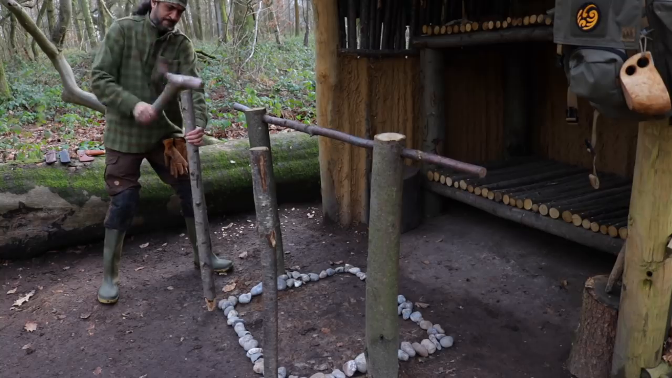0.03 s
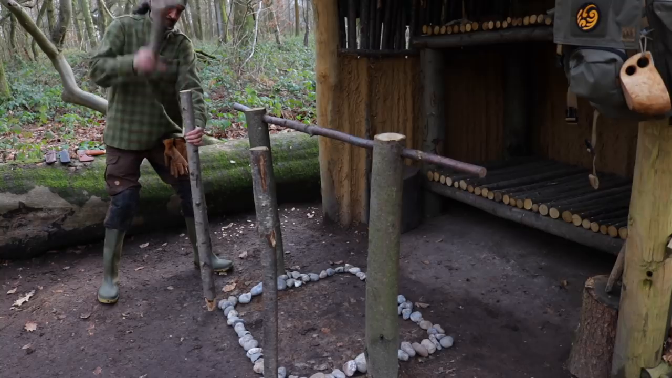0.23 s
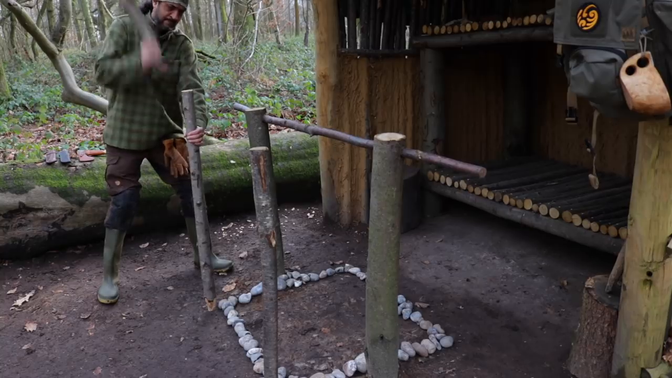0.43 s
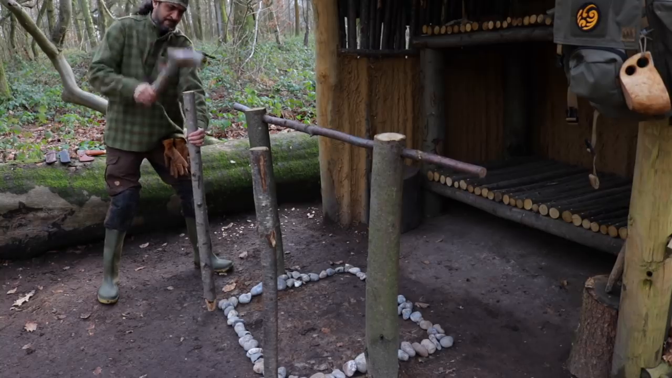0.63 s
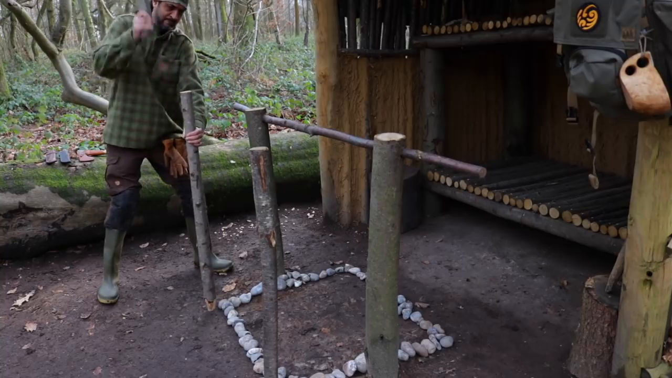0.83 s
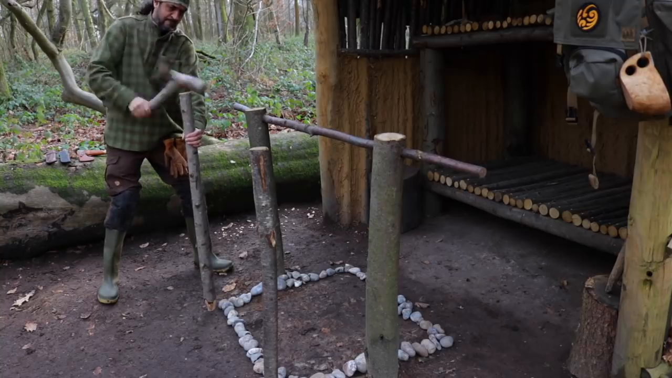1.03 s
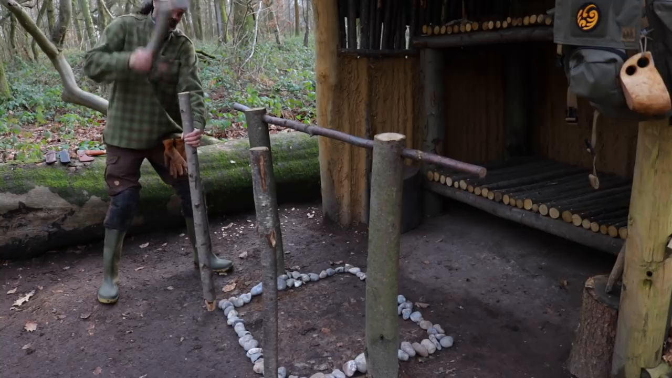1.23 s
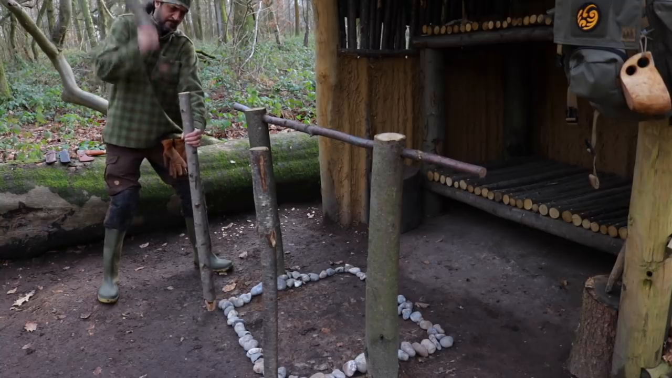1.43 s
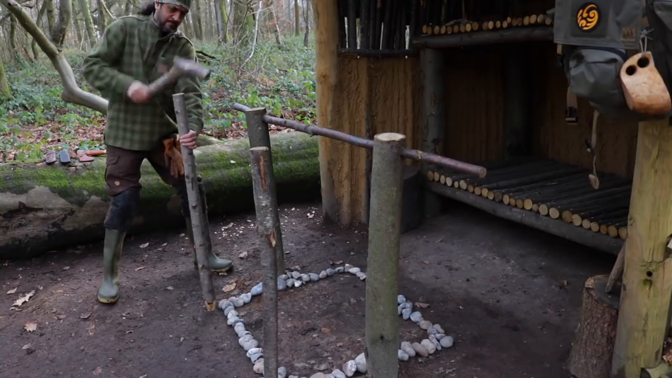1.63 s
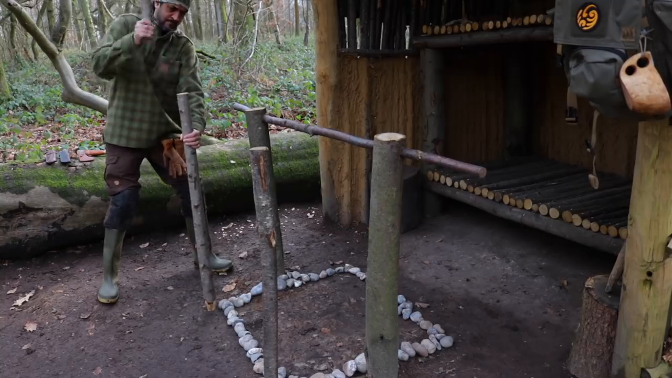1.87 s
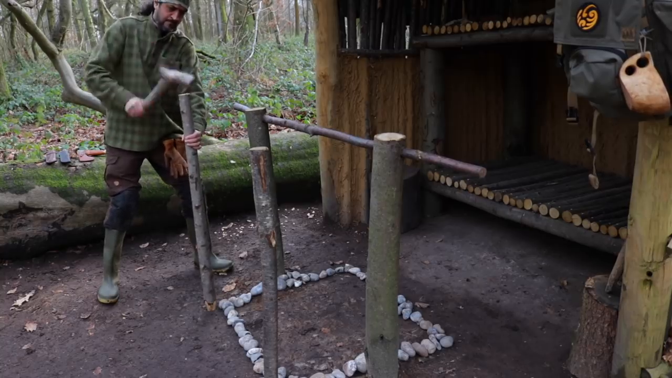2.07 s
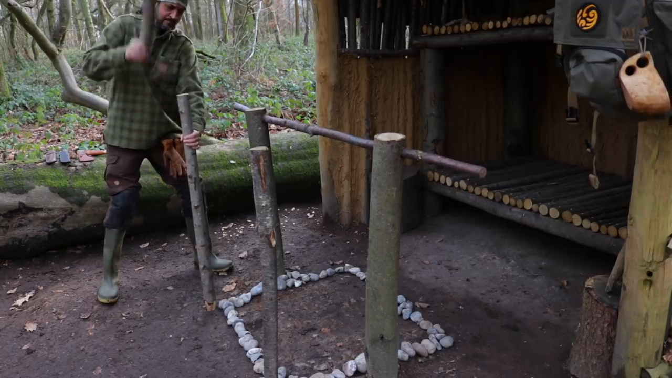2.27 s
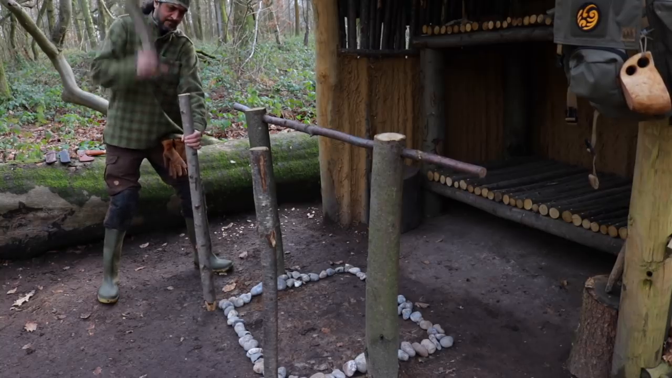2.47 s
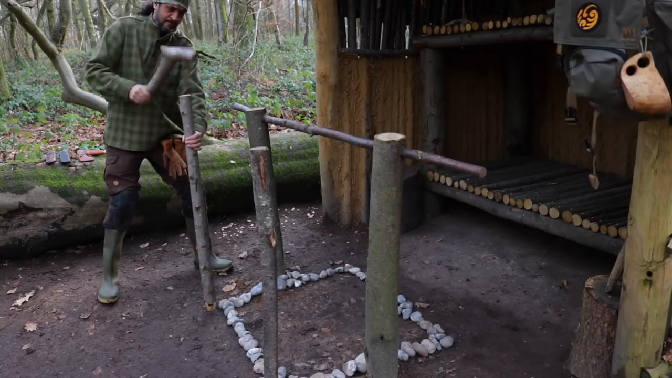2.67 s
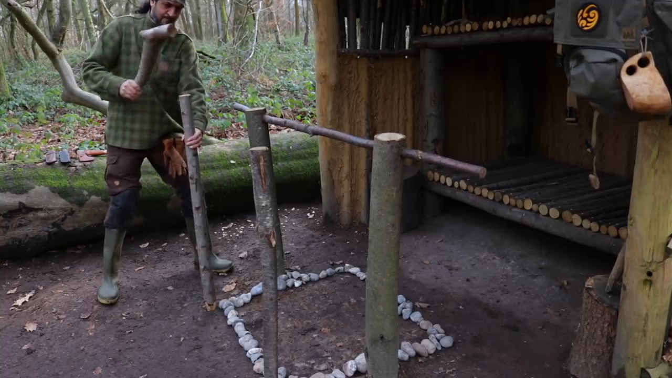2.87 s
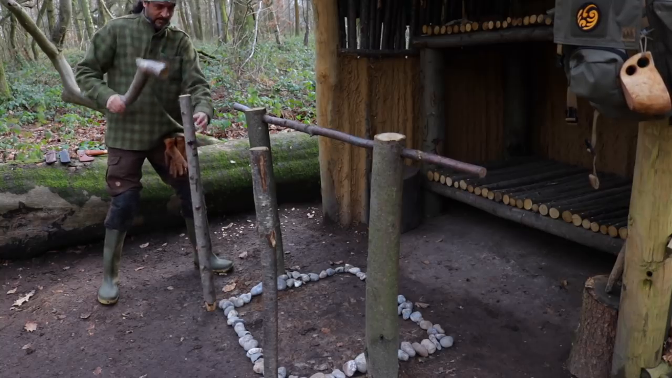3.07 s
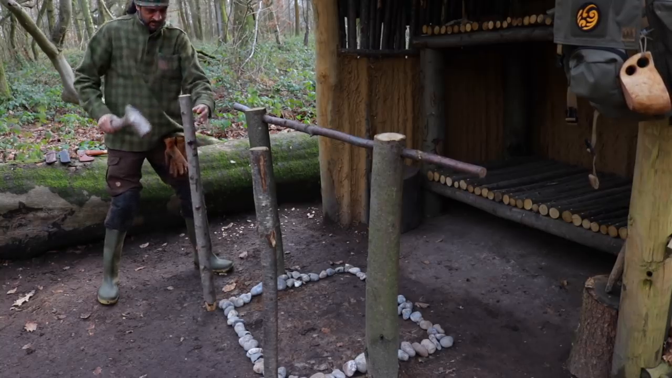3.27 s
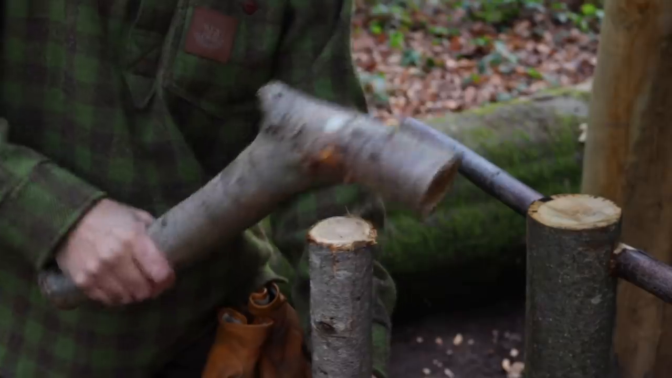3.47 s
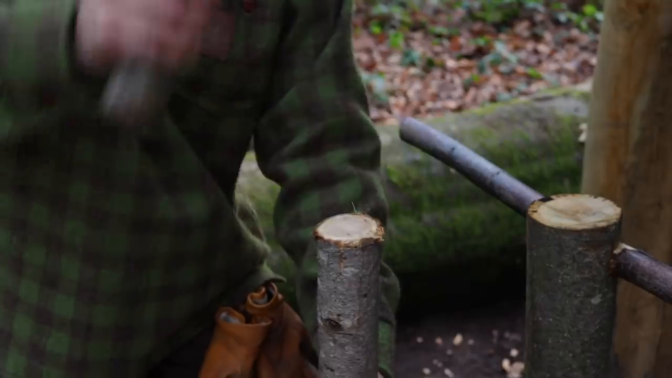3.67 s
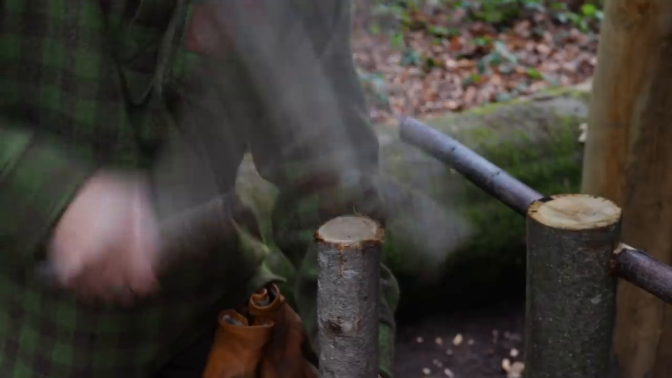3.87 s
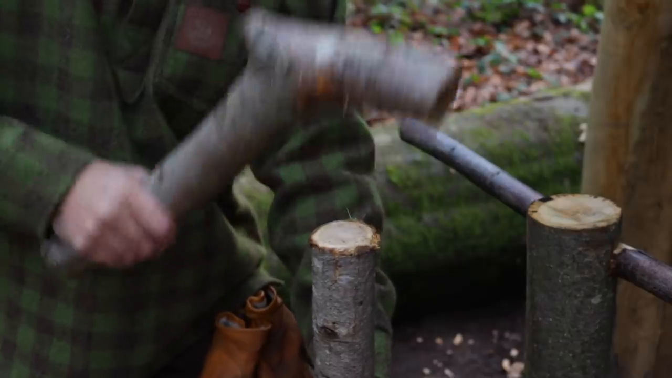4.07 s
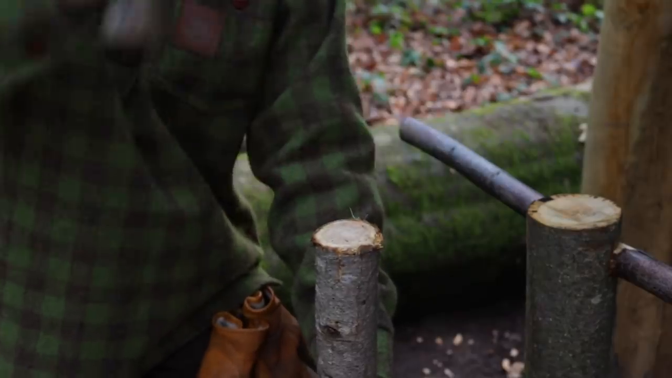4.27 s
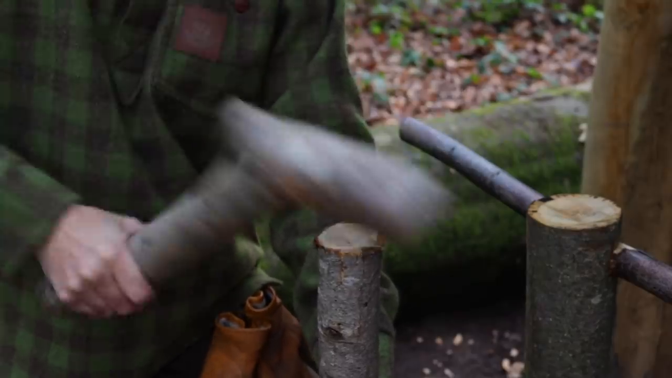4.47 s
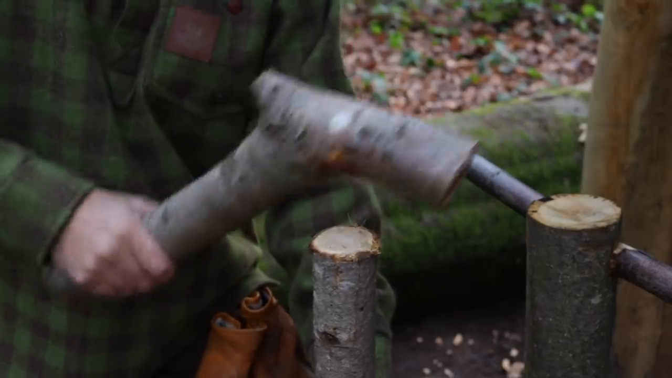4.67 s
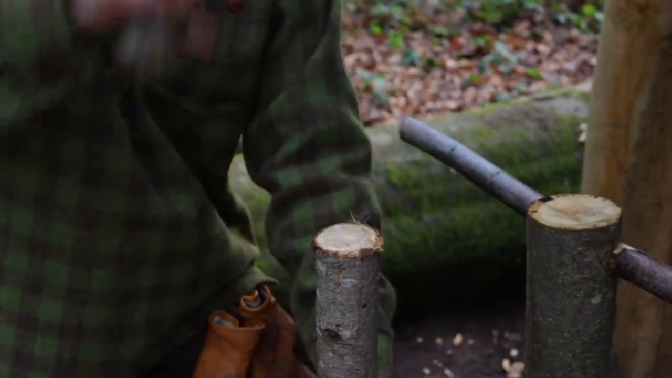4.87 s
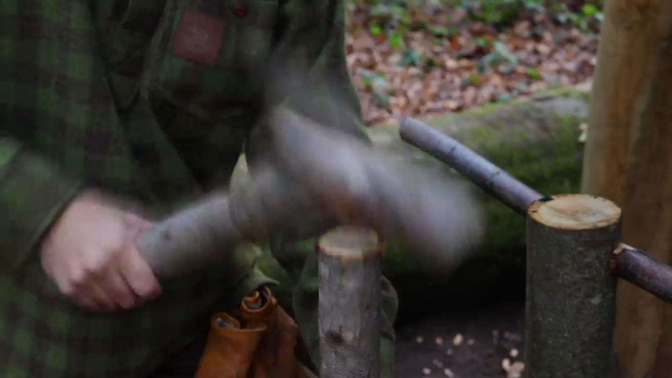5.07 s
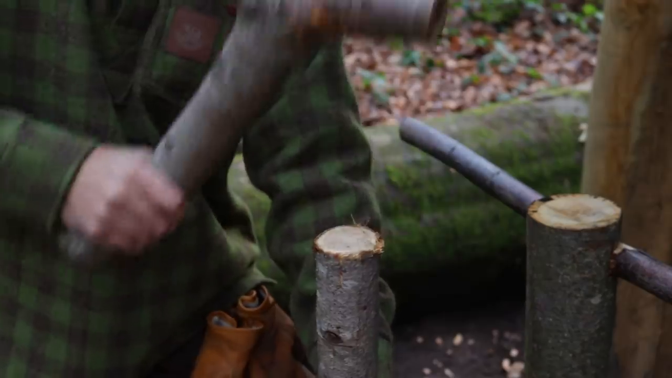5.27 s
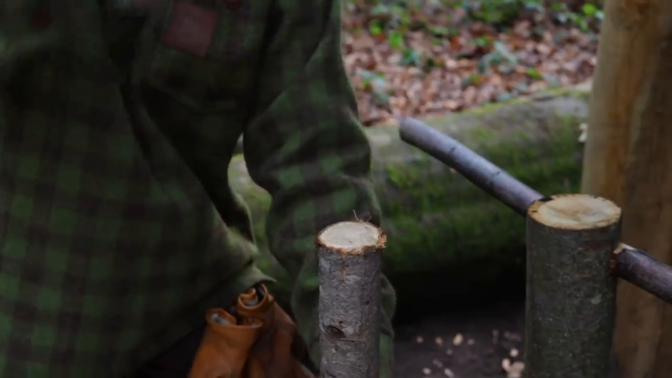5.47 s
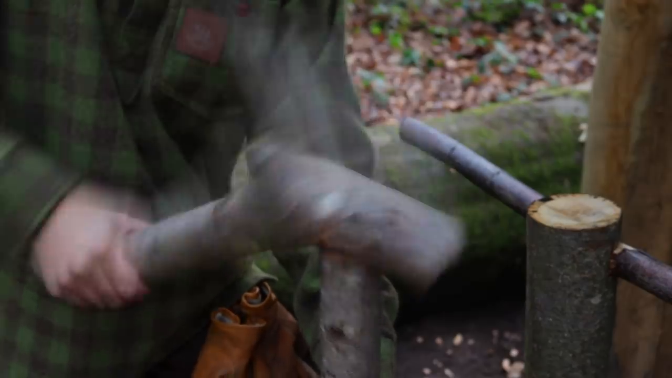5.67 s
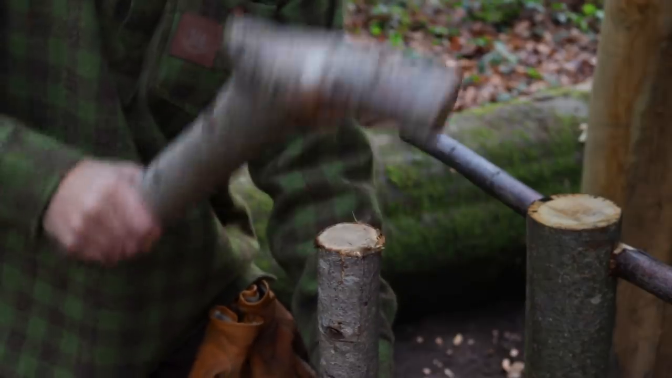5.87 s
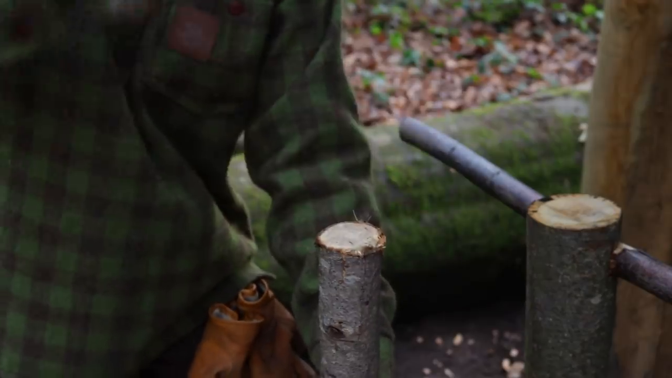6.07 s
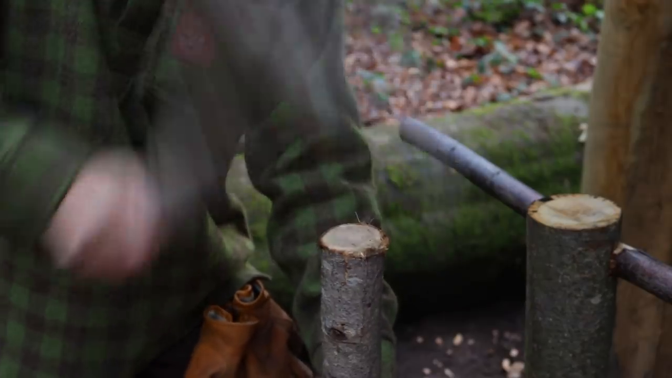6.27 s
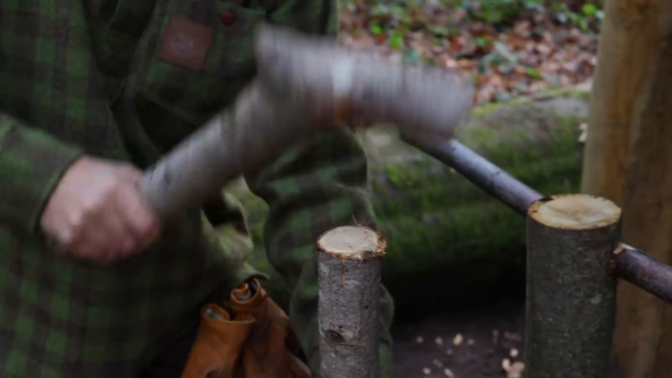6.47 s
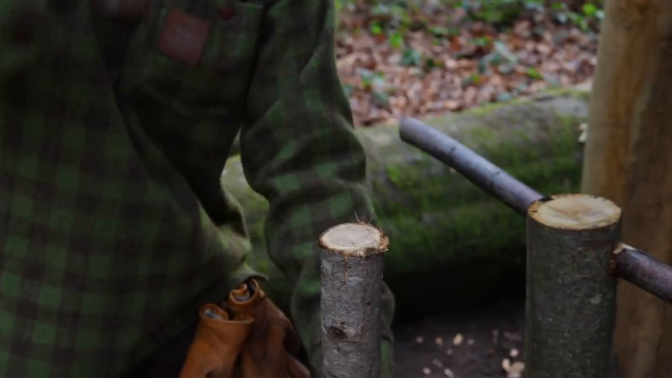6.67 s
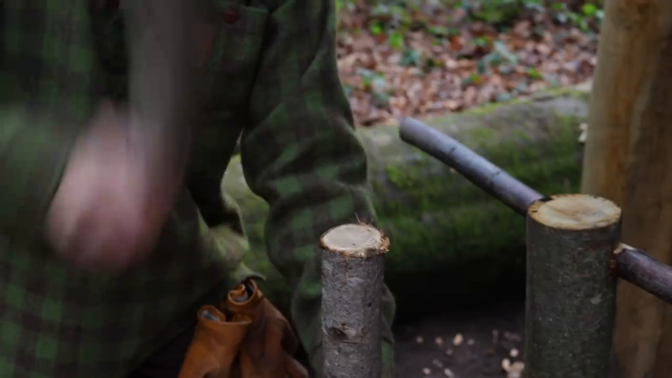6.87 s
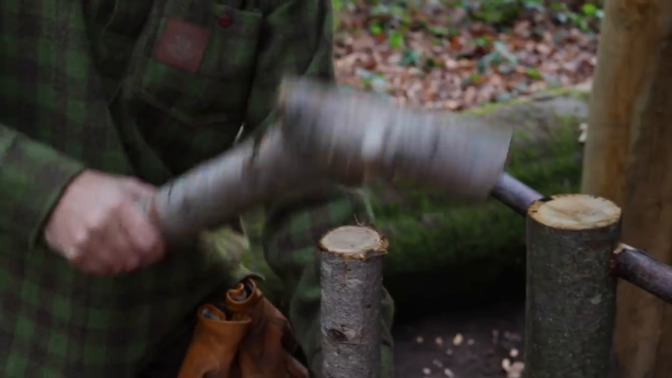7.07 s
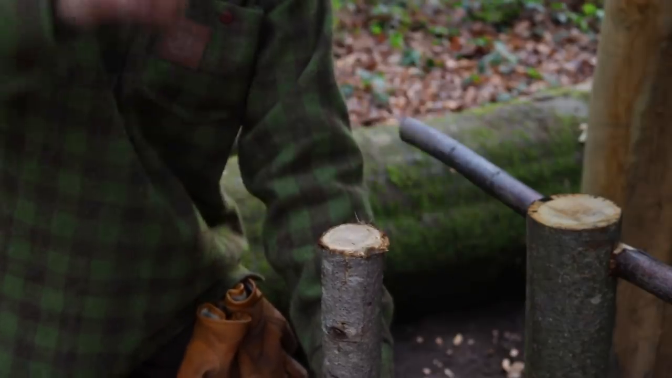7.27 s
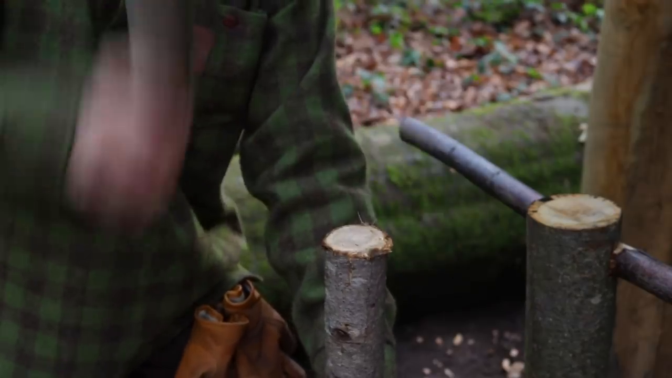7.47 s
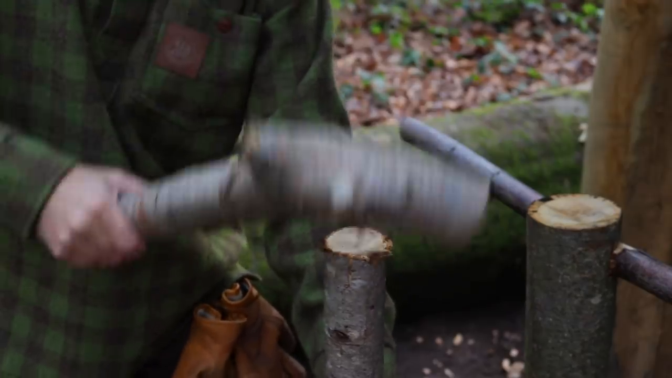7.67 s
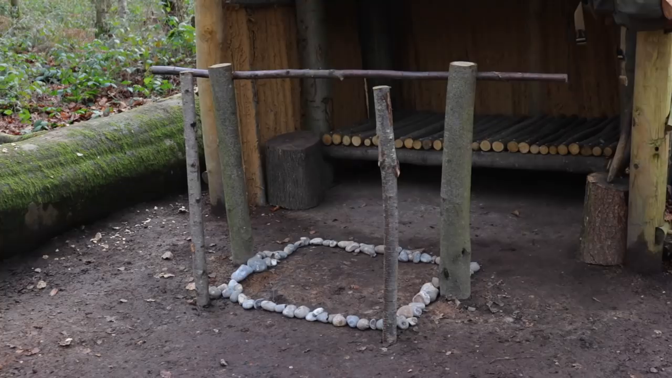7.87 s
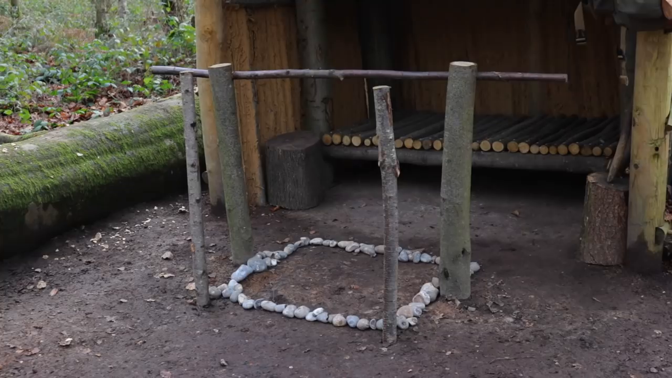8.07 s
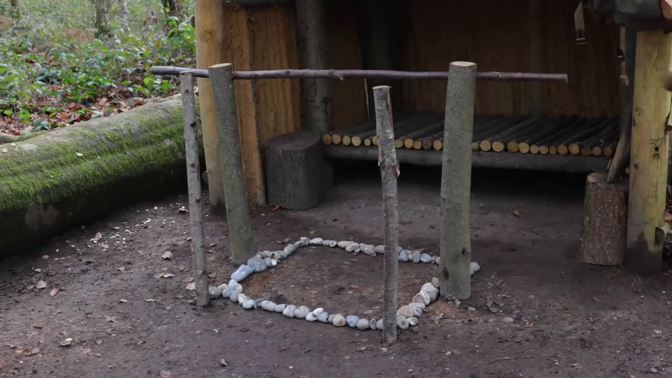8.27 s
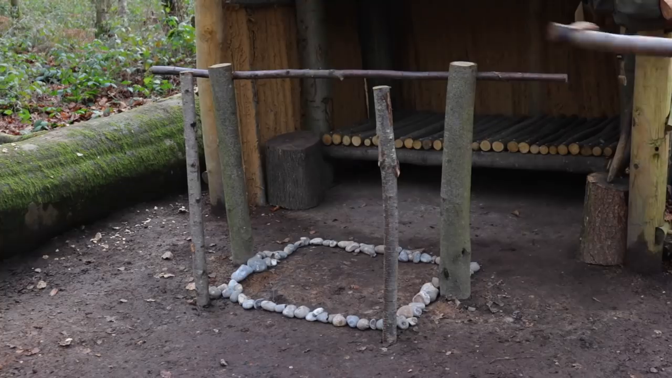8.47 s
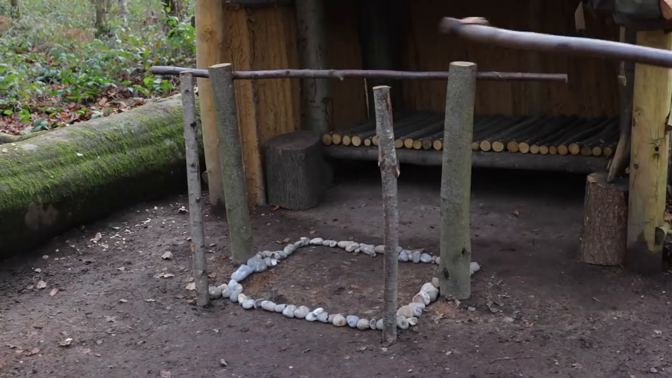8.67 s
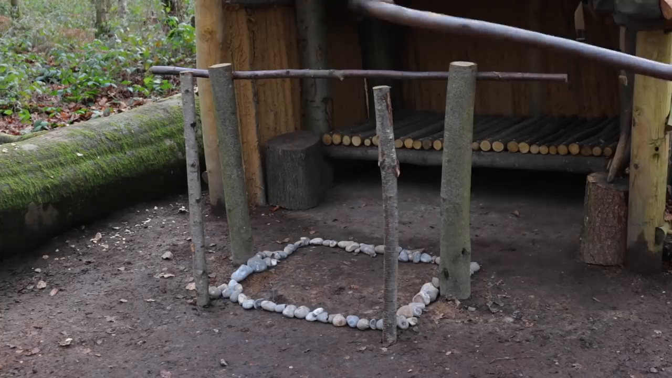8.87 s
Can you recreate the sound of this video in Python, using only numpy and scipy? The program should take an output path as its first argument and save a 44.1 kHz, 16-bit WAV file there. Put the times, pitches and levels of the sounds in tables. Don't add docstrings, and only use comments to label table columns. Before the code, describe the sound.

Steady hollow wood-on-wood hammering in a quiet wood, distant then close, cuts to low wind gusts and faint dry twig rustle.

```python
import sys
import numpy as np
from scipy import signal
from scipy.fft import rfft, irfft
from scipy.io import wavfile
from scipy.ndimage import uniform_filter1d

SR = 44100
rng = np.random.default_rng(int(sys.argv[2]) if len(sys.argv) > 2 else 0)


def natural_amplitude(level_db):
    exponent = np.asarray(level_db, float) / 20
    return 10 ** exponent


def master_out(mix):
    frames = np.transpose(np.atleast_2d(mix))
    ceiling = np.clip(frames, -1, 1)
    pcm = np.round(ceiling * 32767).astype(np.int16)
    wavfile.write(sys.argv[1], SR, pcm)


N = 392931

# (time [s], time [s])
SPOT_CHANGES = (3.426, 7.907)

CALM_LEVELS = -60, -64.5, -50
# (start [s], length [s], rumble level [dB])
GUST_EVENTS = [
    (1.62, 1.48, -46),
    (7.9, 0.562, -30.5),
    (8.61, .09, -41),
    (8.75, 0.104, -32.5),
    (8.86, .1, -30),
]
# (frequency [Hz], level [dB per Hz])
RUMBLE_SPECTRUM = [(12, -26), (20, -3), (43, 7), (103, -1), (147, -11.5), (176, -11), (206, -19.5),
                   (263, -21.5), (344, -28.5), (600, -37.5), (780, -65), (1320, -120)]
# (frequency [Hz], level [dB per Hz])
LEAF_SPECTRUM = [(88, -33.5), (150, -1.5), (361, -5), (662, -9.5), (1340, -13.5), (1500, -18.5),
                 (3420, -25.5), (6260, -38), (14200, -40), (16000, -45.5)]
LEAF_LEVELS = -65.5, -66, -57

# (time [s], strength [dB], hollow body [dB], knock [dB], crack [dB])
FAR_STRIKES = [
    (0.097, -22, 6.5, -9.5, -12),
    (0.588, -24.5, -7, 7.5, -3.5),
    (1.101, -21.5, -9, 4, -3),
    (1.605, -15, -8.5, -19.5, -20.5),
    (2.111, -16, -7, -5.5, -16),
    (2.62, -19, -14, 3, -10),
]
NEAR_STRIKES = [
    (3.96, -10.5, -6, -10, -15.5),
    (4.528, -9, -4, 0, -13.5),
    (5.146, -9.5, -4, 5.5, -11.5),
    (5.75, -9.5, -8, -9.5, -14.5),
    (6.367, -6.5, -8.5, -4, -18),
    (6.978, -7.5, -11, -4.5, -12.5),
    (7.593, -7.5, -9, -7, -13),
]
# (strength [dB], hollow body [dB], knock [dB], crack [dB])
UNSEEN_STRIKE = (-6.5, -13.5, -3, -12.5)
# (level at zero knock [dB], slope [dB per dB])
FAR_RING_RULE = (0.088, 0.65)
NEAR_RING_RULE = (-1.1, -0.18)
# (frequency [Hz], level [dB], T60 [s])
FAR_WOOD_MODES = [(294, -20.5, 0.017), (475, -10, 0.014), (543, -5.5, 0.021), (614, -18.5, 0.011),
                  (695, 1, 0.052), (777, -4.5, 0.012), (920, -1.5, 0.021), (963.4, 1, 0.0052),
                  (1136, -6, 0.024), (1260, -3, 0.017), (1425, 2.5, 0.04), (1542, -5.5, 0.015),
                  (1590, -16.5, .04), (1943, 4, 0.027), (2220, -5.5, 0.011), (2500, -7, 0.02),
                  (2914.6, -6.5, 0.041), (3180, -8, 0.03), (3380, -9, 0.02), (3600, -14.5, 0.014)]
NEAR_WOOD_MODES = [(285, 0, 0.033), (349.7, -22.5, 0.087), (474, -4.5, 0.022), (607, 0.5, 0.033),
                   (637.4, 0, 0.038), (655.5, -9, 0.07), (825.3, 4.5, 0.037), (910, -7, .03),
                   (969, -12, 0.055), (1077, -7, 0.029), (1200.2, -4.5, .03), (1428, 2, 0.03),
                   (1598.8, -2.5, 0.043), (1864.5, -24.5, .03), (1886, 0, 0.031), (2135, 5.5, 0.026),
                   (2500, -10.5, 0.021), (2850, 1, 0.027), (3450, -5.5, 0.028), (3650, -10.5, .012),
                   (4300, -16, .01)]
# (frequency [Hz], ..)
MODE_GROUP_EDGES = (600, 760, 1200, 1800)
# (frequency [Hz], level re blow [dB], T60 [s])
FAR_SOIL_MODES = [(75.4, -22, 0.36), (118, -18.5, 0.066), (172, -24.5, 0.065)]
NEAR_SOIL_MODES = [(67, -20.5, 0.44), (78.15, -20.5, 0.37), (108.8, -25, 0.39), (117.6, -18, 0.2),
                   (172, -17, 0.081)]
# (delay [s], level [dB])
FAR_REFLECTIONS = [(.001, -10), (.0045, 6.5), (.008, -13), (0.014, -7)]
NEAR_REFLECTIONS = [(.0008, 6), (.0033, -4), (.0057, -10), (0.017, -14.5)]
# (frequency [Hz], logs [dB], logs T60 [s], trunks [dB], trunks T60 [s])
SCATTER_BANDS = [(136, -6.5, 0.13, -30.5, 0.13), (376, -2.5, 0.052, -34.5, 0.4),
                 (747.6, 2, 0.077, -39.5, 0.92), (1494, 0, 0.099, -38, 0.85), (2900, 0, 0.069, -30.5, 0.49),
                 (4420, 2, 0.067, -26.5, 0.51), (7030, -5.5, 0.071, -33, .22), (12100, -1, 0.015, -45, .3)]

# (time [s], peak level [dB], frequency [Hz])
TWIG_SNAPS = [(0.9401, -46, 2850), (1.0004, -71.5, 3130), (1.0155, -50.5, 2700), (1.0321, -49, 2516),
              (1.0444, -56.5, 2500), (3.1494, -69.5, 3430), (4.7024, -52, 2500), (7.1792, -62.5, 2370),
              (7.9794, -60, 2400), (8.4794, -58, 3100), (8.6794, -47, 2350)]
SNAP_EDGE_LEVELS = -34.5, -9.5

# (start [s], length [s], level [dB])
BRUSH_EVENTS = [
    (7.97, 0.028, -77),
    (8.46, 0.034, -73.5),
    (8.688, 0.05, -58),
    (8.902, .02, -55),
]
# (frequency [Hz], level [dB per Hz])
RUSTLE_SPECTRUM = [(470, -24.5), (800, -3), (1900, -7.5), (2050, -7.5), (2630, -12.5), (4180, -15.5),
                   (9940, -31.5), (16000, -34)]


def colour(x, spectrum):
    hz, db = np.transpose(spectrum)
    f = np.arange(len(x) // 2 + 1) * SR / len(x)
    weight = natural_amplitude(np.interp(np.log(f + 1), np.log(hz), db))
    y = irfft(rfft(x) * weight, len(x))
    return y / np.std(y)


def band(x, hz, width=0.484):
    edges = [hz / 2 ** width, min(hz * 2 ** width, .45 * SR)]
    return signal.sosfilt(signal.butter(2, edges, "bandpass", fs=SR, output="sos"), x)


def highpass(x, order, hz):
    return signal.sosfilt(signal.butter(order, hz, "highpass", fs=SR, output="sos"), x)


def decay(t, t60):
    return np.exp(-np.log(1000) * t / t60)


def ring(modes, t):
    hz, db, t60 = (column[:, None] for column in np.transpose(modes))
    return natural_amplitude(db) * decay(t, t60) * np.sin(2 * np.pi * hz * t)


def walk(rate):
    hold = int(SR / rate)
    steps = np.repeat(rng.standard_normal(N // hold + 1), hold)
    return 0.82 * uniform_filter1d(uniform_filter1d(steps, hold), hold)[:N]


def swell(events, rise_s, fall_s, sag_db_per_s):
    t, gain = np.arange(N) / SR, np.zeros(N)
    for start, length, db in events:
        sagging = natural_amplitude(db - sag_db_per_s * np.clip(t - start, 0, length))
        rise = np.clip((t - start) / rise_s, 0, 1)
        fall = np.exp(-np.clip(t - start - length, 0, None) / fall_s)
        gain += sagging * rise * fall
    return gain


def add(out, s, x):
    i = int(s * SR)
    out[i:i + len(x)] += x[:N - i]


def listening_spot():
    return np.searchsorted(SPOT_CHANGES, np.arange(N) / SR)


def blend(gain):
    return uniform_filter1d(gain, size=300)


def wind_rumble():
    gusts = swell(GUST_EVENTS, rise_s=0.018, fall_s=0.055, sag_db_per_s=13.5)
    gain = natural_amplitude(np.take(CALM_LEVELS, listening_spot())) + gusts
    turbulence = colour(rng.standard_normal(N), RUMBLE_SPECTRUM)
    return blend(gain) * turbulence * natural_amplitude(4.8 * walk(27))


def leaf_hiss():
    gain = natural_amplitude(np.take(LEAF_LEVELS, listening_spot()))
    hiss = colour(rng.standard_normal(N), LEAF_SPECTRUM)
    return blend(gain) * hiss * natural_amplitude(-1.0 + 0.59 * walk(1.8))


def wood_knock(wood, landing, shares, t, thin_hz, push_s):
    group = np.searchsorted(MODE_GROUP_EDGES, np.array(wood)[:, 0])
    modes = np.array(wood) * (1 + np.outer(.005 * landing[:, 0], [1, 0, 0]))
    mode_gain = natural_amplitude(np.array([0, *shares])[group] + landing[:, 1])
    knock = mode_gain @ ring(modes, t)
    push = np.hanning(int(push_s * SR) + 3)
    pushed = np.convolve(knock, push / push.sum())[:len(t)]
    return highpass(pushed, 3, thin_hz)


def woodland(wet_db, trunks_gain_db, tilt_db):
    t = np.arange(int(.9 * SR)) / SR
    out = np.zeros((2, len(t)))
    for hz, logs_db, logs_t60, trunks_db, trunks_t60 in SCATTER_BANDS:
        treble_db = tilt_db * max(np.log2(hz / 2500), 0)
        logs = natural_amplitude(logs_db) * decay(t, logs_t60) * (1 - np.exp(-t / 0.00027))
        trunks_level = natural_amplitude(trunks_db + trunks_gain_db + treble_db)
        trunks = trunks_level * decay(t, trunks_t60) * (1 - np.exp(-t / 0.036))
        noise = band(rng.standard_normal(len(t)), hz)
        out += natural_amplitude(wet_db - 17.5) * np.array([logs, trunks]) * noise
    return out


def scattered(knock, crack, t, spray_db, room):
    around = knock * (natural_amplitude(-12.5) + natural_amplitude(4.0) * np.exp(-t / 0.0017)) + natural_amplitude(spray_db) * crack
    to_trunks = around * natural_amplitude(-3.5) + natural_amplitude(-6.5) * knock
    return signal.fftconvolve([around, to_trunks], room, axes=1).sum(0)


def soil_thud(soil, landing, hollow_db):
    t = np.arange(int(.7 * SR)) / SR
    modes = np.array(soil) * (1 + np.outer(0.012 * landing[:len(soil), 0], [1, 0, 0]))
    modes = modes + np.outer(landing[:len(soil), 1], [0, 1, 0])
    level = natural_amplitude(.4 * (hollow_db + 7.5))
    return level * ring(modes, t).sum(0) * (1 - np.exp(-t / 0.0083))


def blows(strikes, ring_rule, wood, soil, reflections, wet_db, trunks_gain_db, tilt_db, spray_db,
          thin_hz, push_s, crack_db, soil_lag_s):
    out, t = np.zeros(N), np.arange(SR // 5) / SR
    for s, db, hollow_db, knock_db, edge_db in strikes:
        ring_db = ring_rule[0] + ring_rule[1] * knock_db
        landing = rng.standard_normal((len(wood), 2))
        shares = hollow_db, ring_db, knock_db, edge_db
        knock = wood_knock(wood, landing, shares, t, thin_hz, push_s)
        crack = natural_amplitude(crack_db + edge_db) * band(1. * (t == 0), 6000, 1.1)
        for lag_s, echo_db in reflections:
            dulled = crack * np.exp(-lag_s / 0.0077)
            add(out, s + lag_s, natural_amplitude(db + echo_db) * (knock + dulled))
        room = woodland(wet_db, trunks_gain_db, tilt_db)
        add(out, s + .003, natural_amplitude(db) * scattered(knock, crack, t, spray_db, room))
        add(out, s + soil_lag_s, natural_amplitude(db) * soil_thud(soil, landing, hollow_db))
    return out


def twig_snaps():
    out, t = np.zeros(N), np.arange(SR // 10) / SR
    for s, db, hz in TWIG_SNAPS:
        click = ring([(hz, 0, .003)], t)[0]
        litter = rng.standard_normal(len(t)) * decay(t, 0.071)
        edge = band(litter * np.exp(-t / 0.00072), 6160, 0.62)
        edge_db = SNAP_EDGE_LEVELS[int(s > SPOT_CHANGES[0])]
        body = band(band(click + natural_amplitude(-12.5) * litter, hz, 0.59), .85 * hz, 0.972)
        add(out, s, natural_amplitude(db + 13.5) * (body + natural_amplitude(edge_db) * edge))
    return out


def twig_rustle():
    stirring = natural_amplitude(-70.5) * (listening_spot() == 2)
    gain = stirring + swell(BRUSH_EVENTS, rise_s=0.0087, fall_s=0.0242, sag_db_per_s=7.5)
    burst_db = 1.8 * rng.exponential(size=N // 64 + 1).repeat(64)[:N]
    grains = rng.standard_normal(N) * natural_amplitude(burst_db)
    return blend(gain) * colour(grains, RUSTLE_SPECTRUM) * natural_amplitude(3.5)


def scene():
    t = np.arange(N) / SR
    close_opens, windy_opens = [np.clip((t - s) / .006, 0, 1) for s in SPOT_CHANGES]
    air = wind_rumble() + leaf_hiss()
    far = blows(FAR_STRIKES, FAR_RING_RULE, FAR_WOOD_MODES, FAR_SOIL_MODES, FAR_REFLECTIONS,
                wet_db=-5, trunks_gain_db=3.38, tilt_db=-2.5, spray_db=13,
                thin_hz=168.8, push_s=0.0003, crack_db=5.0, soil_lag_s=0.012)
    near_strikes = [(3.35, *UNSEEN_STRIKE), *NEAR_STRIKES]
    near = blows(near_strikes, NEAR_RING_RULE, NEAR_WOOD_MODES, NEAR_SOIL_MODES, NEAR_REFLECTIONS,
                 wet_db=-8.5, trunks_gain_db=-1.03, tilt_db=4, spray_db=15,
                 thin_hz=216, push_s=0.00041, crack_db=2, soil_lag_s=0.0098)
    hammering = far * (1 - close_opens) + near * (close_opens - windy_opens)
    return (air + hammering + twig_snaps() + twig_rustle())[None]


def roll_off(x):
    return signal.sosfilt(signal.butter(12, 16850, fs=SR, output="sos"), x)


def record(dry):
    thin = highpass(dry, 2, 45.5)
    thin = thin - 0.13 * band(thin, 2047, 0.19)
    clip_level = .58
    flat = thin / (1 + np.abs(thin / clip_level) ** 12) ** (1 / 12)
    mix = signal.sosfilt(signal.ellip(4, .2, 20, 15100, fs=SR, output="sos"), flat)
    return roll_off(mix)


dry = scene()
out = record(dry)
master_out(out)
```